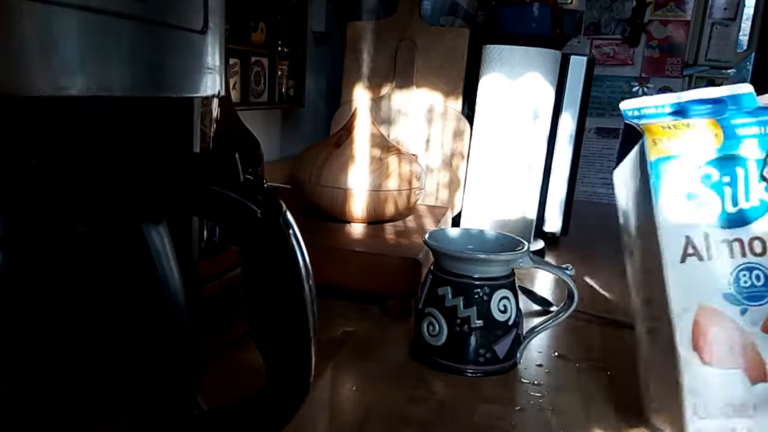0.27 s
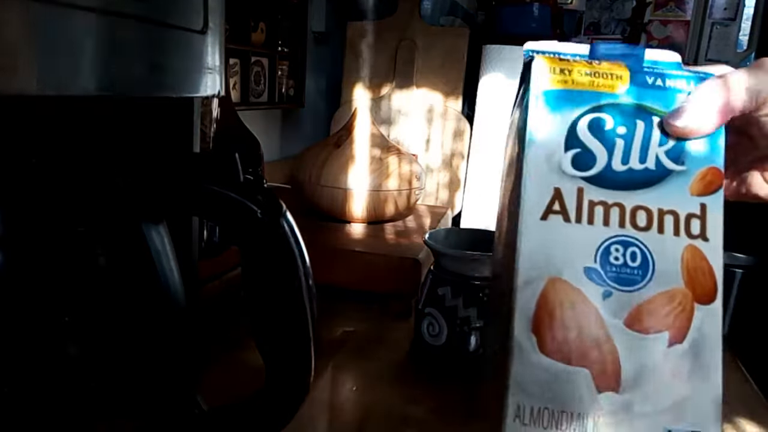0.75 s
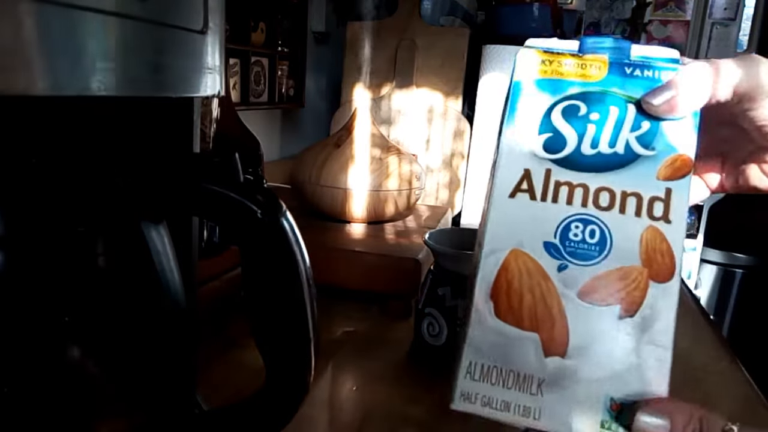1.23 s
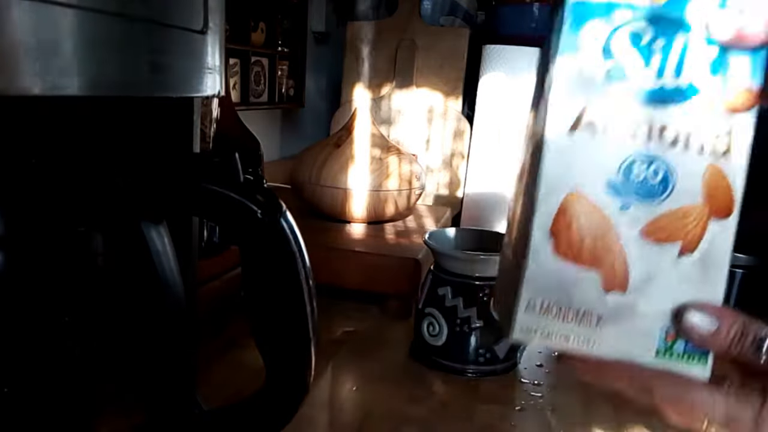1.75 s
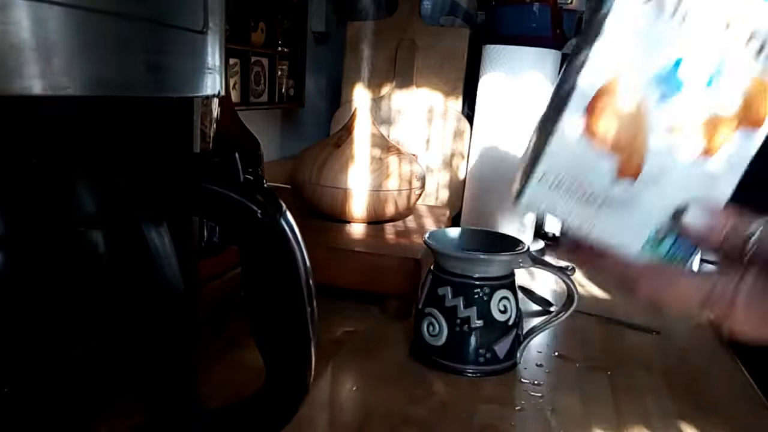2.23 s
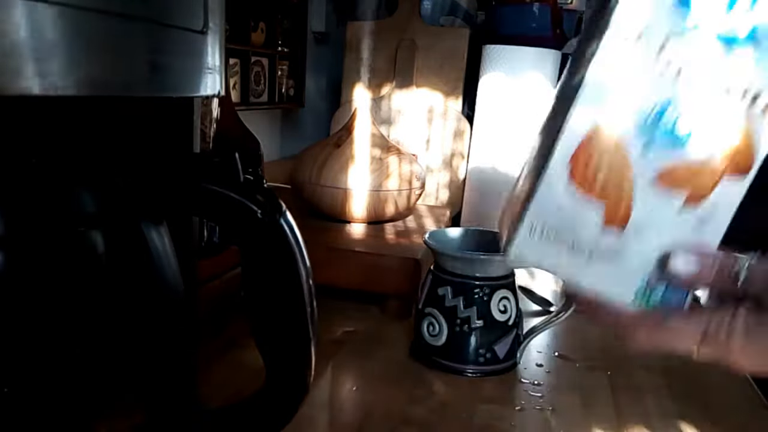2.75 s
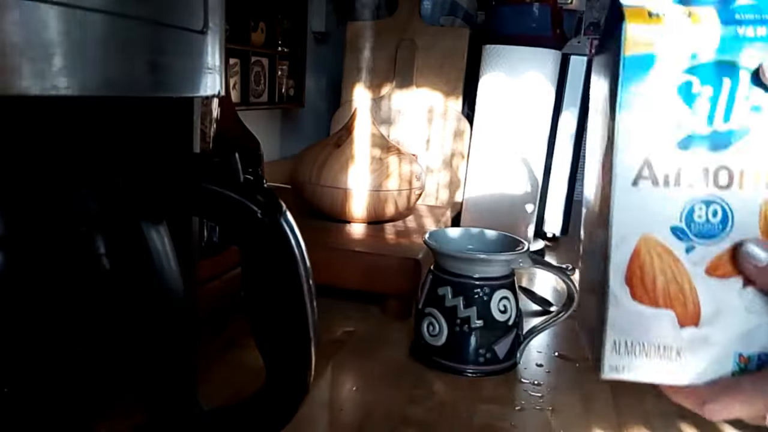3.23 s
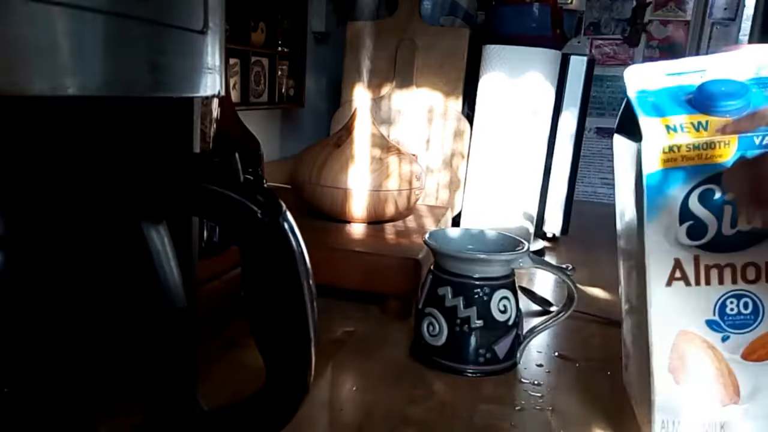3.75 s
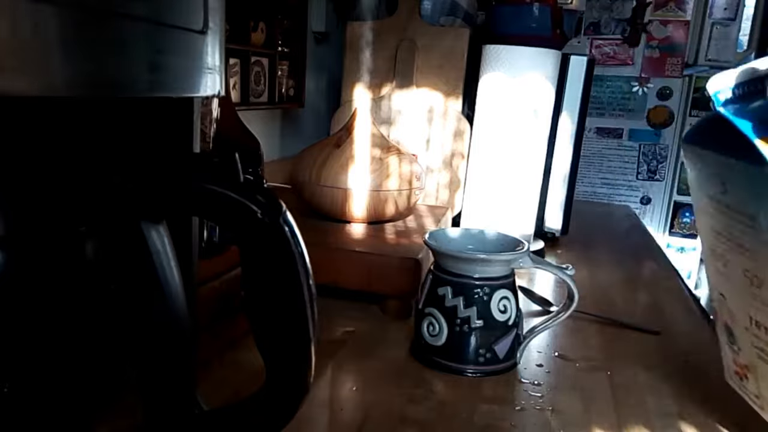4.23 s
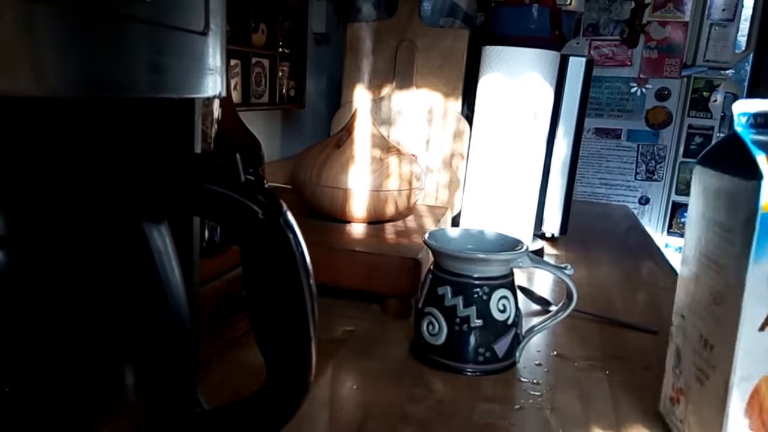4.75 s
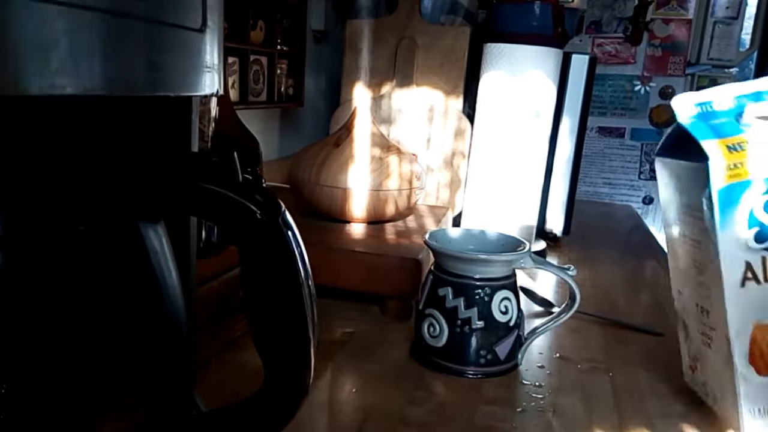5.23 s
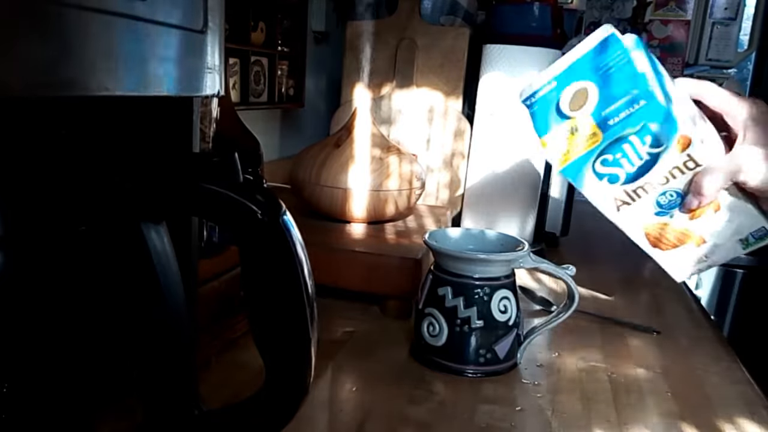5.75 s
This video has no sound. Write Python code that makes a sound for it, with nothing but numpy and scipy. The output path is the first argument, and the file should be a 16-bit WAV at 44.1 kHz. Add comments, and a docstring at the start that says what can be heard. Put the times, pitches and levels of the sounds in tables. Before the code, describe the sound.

A cardboard milk carton is handled close to a modest microphone. Light scuffing leads to a crisp double knock, then quick shakes make the liquid slosh and splash inside while the walls tick and rattle. After a pause there are a few hollow taps, more finger rustle, a strong boxy thud and a faint last scuff. Low room hum throughout, very little reverberation.

```python
"""In a quiet kitchen a hand lifts a paper carton of milk, shakes it and sets it on a wooden counter.
An appliance hums as wavering sines over shaped room noise; fingers rustle as dense grains on the card.
The card ticks in struck modes and rattling grains; the hollow carton thumps as softly begun decaying sines.
The milk slaps the walls, gurgles and sprays: random clicks through resonances, surging together."""
import sys
import numpy as np
from scipy import signal
from scipy.fft import rfft, irfft, next_fast_len
from scipy.io import wavfile

SR = 44100
rng = np.random.default_rng(int(sys.argv[2]) if len(sys.argv) > 2 else 0)


def wrap_up_sound(samples):
    """Save the sound to the file named by the first command line argument, as 16-bit audio."""
    columns = np.atleast_2d(samples).T
    # keep every value between -1 and 1, then stretch to whole-number steps
    tamed = np.clip(columns, -1, 1)
    steps = np.round(tamed * 32767).astype(np.int16)
    wavfile.write(sys.argv[1], SR, steps)


N = 263718


def from_db(db):
    """Logarithmic level: the amplitude gain of a value in dB."""
    return 10 ** (np.asarray(db) / 20)


def rms_one(x):
    """Normalisation: scales a signal to rms 1."""
    return x / np.sqrt(np.mean(x ** 2) + 1e-20)


def sine(hz, t):
    """Simple harmonic motion: a sine of peak 1."""
    return np.sin(2 * np.pi * hz * t)


def decay(t, t60_s):
    """Exponential damping: the amplitude falls 60 dB in t60_s."""
    return from_db(-60 * t / t60_s)


def coloured(x, spectrum):
    """Spectral shaping: weights a white signal by a (frequency_hz, level_db) table; rms 1."""
    size = next_fast_len(N)
    hz, level_db = np.transpose(spectrum)
    log_hz = np.log(np.arange(size // 2 + 1) * SR / size + 1)
    gain = from_db(np.interp(log_hz, np.log(hz), level_db))
    return rms_one(irfft(rfft(x, size) * gain, size)[:N])


def drift(rate_hz):
    """Low-pass noise: a slow random fluctuation of rms 1."""
    r = np.exp(-2 * np.pi * rate_hz / SR)
    noise = rng.standard_normal(N + SR)
    return rms_one(signal.lfilter([1], [1, -2 * r, r * r], noise)[SR:])   # settled after one second


def resonance(x, hz, width_hz):
    """Damped resonator: a two-pole band-pass with gain 1 at its peak."""
    r = np.exp(-np.pi * width_hz / SR)
    poles = [1, -2 * r * np.cos(2 * np.pi * hz / SR), r * r]
    return signal.lfilter([(1 - r * r) / 2, 0, (r * r - 1) / 2], poles, x)


def grains(per_s, spread_db):
    """Random impulse process: clicks of uneven size and sign."""
    sizes = from_db(spread_db * np.minimum(rng.exponential(1, N), 4))
    signs = rng.choice([-1, 1], N)
    return sizes * signs * (rng.random(N) < per_s / SR)


def add(out, start_s, sound):
    """Superposition: mixes a sound in at its start time."""
    at = round(start_s * SR)
    out[at:at + len(sound)] += sound[:N - at]


def played(swells, layers):
    """Swelling envelopes: straight in dB up to a crest and down; overlapping swells add in power."""
    onset_depth_db = 13.5   # how far under its crest a swell is one rise time earlier
    t, out = np.arange(N) / SR, 0
    shapes = []
    for crest_s, rise_s, fall_db_per_s, *_ in swells:
        before_db = onset_depth_db * (crest_s - t) / max(rise_s, .002)
        after_db = fall_db_per_s * (t - crest_s)
        shapes.append(from_db(-np.maximum(before_db, after_db)))
    power_shapes = np.array(shapes) ** 2
    for level_db, layer in zip(np.transpose(swells)[3:], layers):
        out = out + np.sqrt(from_db(level_db) ** 2 @ power_shapes) * layer
    return out


# spectrum of the room noise: frequency_hz, relative level_db (per Hz)
ROOM_SPECTRUM = [(25, -18), (48, 0.5), (70, -23), (86, -14), (110, -0.5), (170, -9.5), (269, -2.5),
                 (382, -12.5), (473, -3.5), (637, -13), (881, -13.5), (1000, -17.5), (2000, -24),
                 (4000, -26.5), (5200, -22), (7200, -24), (8200, -35.5), (11500, -42.5), (13800, -41.5),
                 (14700, -28.5), (15800, -36)]
# partials of the appliance motor: frequency_hz, mean level_db (rms)
MOTOR_HUM = [(59.2, -65.5), (118.4, -69), (236.9, -71)]
# noise ringing in the kitchen: frequency_hz, width_hz, level_db (rms)
ROOM_RESONANCES = [(271, 64, -66.5), (513, 67, -76)]


def room_tone():
    """Stationary background: steady noise, a slightly wavering motor hum and two broad room resonances."""
    t = np.arange(N) / SR
    out = from_db(-58) * coloured(rng.standard_normal(N), ROOM_SPECTRUM)
    for hz, level_db in MOTOR_HUM:
        level = from_db(level_db + 0.84 * drift(3.3))
        phase = 2 * np.pi * hz * t + 0.25 * drift(2.6)
        out += level * np.sqrt(2) * np.sin(phase)
    for hz, width_hz, level_db in ROOM_RESONANCES:
        out += from_db(level_db) * rms_one(resonance(rng.standard_normal(N), hz, width_hz))
    return out


def kitchen(x):
    """Reverberation: convolution with decaying dull noise after a short gap."""
    t60_s, gap_s = 0.082, .006
    t = np.arange(SR // 2) / SR
    dull_noise = signal.lfilter([1], [1, -.5], rng.standard_normal(len(t)))
    tail = dull_noise * decay(t, t60_s) * (t > gap_s)
    return signal.fftconvolve(x, tail / np.sqrt(np.sum(tail ** 2)))[:N]


# air and panel resonances of the carton: frequency_hz, width_hz, gain_db
CARTON_RESONANCES = [(238.5, 73, -4.5), (310, 106, 2), (386, 117, -0.5), (552, 250, -19), (127.4, 29, -5)]


def hollow(x):
    """Cavity resonance: the carton's low modes in parallel with alternating sign; rms 1."""
    out = 0
    for k, (hz, width_hz, gain_db) in enumerate(CARTON_RESONANCES):
        out = out + (-1) ** k * from_db(gain_db) * resonance(x, hz, width_hz)
    return rms_one(out)


# spectrum shared by the splash and the finger scuff: frequency_hz, relative level_db (per Hz)
SPLASH_SPECTRUM = [(290, 2.5), (500, -2), (742, 1.5), (996, -2), (1510, 1.5), (1620, 0), (2200, -3),
                   (4500, -9.5), (5850, -45), (9900, -120)]
# spectrum shared by milk spray, card rustle and tick noise: frequency_hz, relative level_db (per Hz)
SPRAY_SPECTRUM = [(2500, -5), (3500, -5), (4420, -3), (6490, 1.5), (7410, -2.5), (9000, -16.5),
                  (10700, -26), (13400, -37), (14700, -30), (15800, -0.5)]
# fingers sliding on the card, timed at the firmest grip:
# crest_s, rise_s, fall_db_per_s, rustle_db, scuff_db, dull_rub_db
FINGER_SLIDES = [(0.28, 0.14, 42, -62, -68, -65.5), (0.72, 0.16, 68, -58, -62, -61),
                 (0.845, 0.012, 158, -56, -61, -54), (1.44, 0.093, 67, -60.5, -60.5, -61),
                 (1.52, 0.012, 51, -63, -56, -47), (1.585, 0.047, 200, -63, -55, -39.5),
                 (1.83, 0.26, 90, -58.5, -63.5, -74), (3.995, .01, 100, -55.5, -60, -58),
                 (4.37, 0.13, 51, -62, -64.5, -59), (4.53, .008, 56, -84, -81, -60),
                 (4.705, 0.015, 80, -55, -64, -51.5), (4.81, 0.073, 41, -56, -67, -72),
                 (4.872, 0.017, 250, -51.5, -53, -37.5), (4.92, .02, 102, -62, -56, -48),
                 (5.2, 0.17, 92, -66, -74, -65)]


def handling():
    """Sliding friction: skin on coated card rustles and scuffs, with a dull rub through the hollow box."""
    slips = from_db(2.9 * drift(12.3))
    rustle = slips * coloured(grains(4000, 2.1), SPRAY_SPECTRUM)
    scuff = slips * coloured(grains(3000, 1.8), SPLASH_SPECTRUM)
    dull_rub = hollow(grains(500, 2.4))
    return played(FINGER_SLIDES, (rustle, scuff, dull_rub))


# modes of the stiff card and cap: frequency_hz, width_hz, gain_db
CARD_MODES = [(680, 240, 10.5), (1100, 720, 7), (1510, 280, 5), (1816, 91, -1), (2216, 210, 1.5),
              (2874, 66, -1.5), (3260, 430, 0), (4000, 150, -4.5), (5700, 150, -29), (6700, 300, -10)]
# ticks and slaps on the card walls, the levels taken before onset shaping:
# start_s, low_ring_db, low_ring_hz, high_ring_hz, card_noise_db, spray_db, rattle_t60_s
CARD_TICKS = [(0.26, -63, 1220, 6010, -61.5, -59, 0.092), (1.5891, -33.5, 1570, 7350, -43.5, -46, 0.077),
              (1.656, -42, 1510, 5700, -45, -54, .05), (1.6614, -24, 1510, 5700, -36.5, -43, 0.1),
              (1.662, -24, 3720, 4400, -43.5, -48, 0.16), (1.8085, -62, 1050, 5510, -75, -57.5, 0.25),
              (1.947, -70, 1300, 5430, -82, -55, 0.05), (2.0559, -49, 2200, 3230, -65, -52, 0.16),
              (2.1205, -49, 2200, 5840, -38, -37.5, 0.13), (2.217, -33, 2020, 4860, -65, -47, 0.063),
              (2.2715, -27, 2280, 5150, -33, -32.5, 0.084), (2.2803, -12, 2060, 6220, -37, -41, 0.13),
              (2.3035, -21, 2320, 2770, -38, -33, 0.21), (2.3877, -31, 2500, 6030, -38, -31.5, 0.094),
              (2.4103, -38, 1460, 3780, -43, -36.5, 0.11), (2.4622, -26, 1770, 2760, -40, -54, 0.16),
              (2.5336, -25, 2070, 6640, -39, -36.5, 0.25), (2.769, -31, 2140, 5950, -41, -36, 0.11),
              (2.7897, -20, 2190, 2910, -31, -39, .12), (2.8088, -25, 1730, 6700, -46, -27.5, 0.067),
              (3.0593, -37.5, 1460, 6710, -60, -61, 0.079), (3.078, -62, 1500, 9300, -62, -63, .03),
              (3.109, -38, 1800, 6540, -54, -48, 0.056), (3.13, -60, 1800, 9300, -67, -60, .03),
              (3.139, -40, 1420, 2630, -46, -54, 0.058), (3.6094, -62, 1310, 6300, -74, -55.5, 0.3),
              (3.9723, -25.5, 2600, 3580, -39, -35.5, 0.057), (3.99, -44, 2180, 2740, -53.5, -64, 0.23),
              (4.1141, -38, 1496, 6600, -49.5, -46.5, .06), (4.275, -48, 2210, 4600, -57, -58, 0.073),
              (4.2824, -36, 1660, 2620, -53, -48.5, 0.18), (4.8168, -28, 2250, 4530, -41, -40.5, 0.11),
              (4.8167, -28, 1100, 5970, -41, -47.5, 0.11), (4.8276, -24.5, 2200, 6000, -52, -46, 0.13),
              (4.8374, -29, 2260, 3730, -49, -49, 0.1), (4.9192, -59, 1580, 6220, -51.5, -53.5, 0.13),
              (4.9418, -44, 1033, 3200, -39.5, -44.5, 0.05), (4.947, -42, 3230, 3300, -52, -62, 0.044)]


def ticks():
    """Modal excitation: a crack rings two pitches and the card's modes, then small contacts rattle away."""
    out, t = np.zeros(N), np.arange(SR // 4) / SR
    contacts = grains(2500, 3.1)
    spray = coloured(rng.standard_normal(N), SPRAY_SPECTRUM)
    mode_hz = np.array(CARD_MODES)[:, 0]
    signs = (-1) ** np.arange(len(CARD_MODES))
    rattled = np.array([from_db(db) * rms_one(resonance(contacts, hz, width_hz))
                        for hz, width_hz, db in CARD_MODES])
    struck = np.array([from_db(db) * sine(hz, t) * np.exp(-np.pi * width_hz * t)
                       for hz, width_hz, db in CARD_MODES])
    soft_onset = 1 - np.exp(-t / 0.0017)
    sharp_onset = 1 - np.exp(-t / 0.0001)
    for start_s, level_db, low_hz, high_hz, card_db, spray_db, t60_s in CARD_TICKS:
        at = round(start_s * SR)
        now = slice(at, at + len(t))
        # modes weaken with their distance in octaves from the two ring pitches
        near_low = from_db(-5.0 * np.abs(np.log2(mode_hz / low_hz)))
        near_high = from_db(-12.0 * np.abs(np.log2(mode_hz / high_hz)))
        weights = (near_low + 0.18 * near_high) * signs
        low = from_db(level_db) * sine(low_hz, t) * decay(t, 31.3 / low_hz)
        high = from_db(spray_db + 0.5) * sine(high_hz, t) * decay(t, 120.0 / high_hz)
        # the first contact strikes all the card's modes at once
        crack = from_db(card_db - 4) * (weights @ struck)
        spray_now = from_db(spray_db) * spray[now]
        snap = 1.28 * spray_now * decay(t, 0.0078)   # first dry contact
        rattle = from_db(card_db) * rms_one(weights @ rattled[:, now]) + spray_now
        sharp = (high + snap + crack) * sharp_onset
        soft = (low + rattle * decay(t, t60_s)) * soft_onset
        add(out, start_s, sharp + soft)
    return out


# hollow thumps of the carton, the levels taken before decay; air and panel also before the soft onset:
# start_s, air_level_db (peak), pitch_hz, t60_s, panel_db (peak), counter_thud_db (rms)
CARTON_THUMPS = [(0.284, -38, 116, .06, -64, -66), (0.839, -34, 135, .064, -64, -48),
                 (0.8431, -22, 233, 0.022, -60, -55), (0.86, -35, 134, .057, -60, -53),
                 (0.899, -36, 108, .047, -58, -62), (1.511, -39, 273, 0.073, -62, -63),
                 (1.5906, -19, 279, 0.029, -15.5, -54), (1.6611, -12.5, 388, 0.032, -55, -70),
                 (1.689, -37.5, 445, 0.16, -56, -65), (2.117, -28.5, 332, 0.074, -47, -51),
                 (2.33, -24.5, 274, 0.079, -45, -57), (2.372, -22.5, 301, 0.042, -38, -41),
                 (2.407, -27, 374, 0.056, -25, -42), (2.459, -29, 310, 0.043, -48, -57),
                 (2.623, -37.5, 310, 0.12, -54, -60), (2.789, -30, 278.5, 0.11, -41, -56),
                 (2.905, -28, 251, 0.08, -32.5, -62), (2.93, -38, 130, 0.092, -45, -53),
                 (3.132, -45, 386, 0.15, -50, -53), (3.97, -26, 350, 0.032, -27.5, -62),
                 (3.989, -31.5, 450, 0.027, -35, -52), (4.034, -40, 401, .04, -62, -62),
                 (4.048, -39, 380, 0.038, -53, -66), (4.114, -29.5, 413, 0.032, -40, -67),
                 (4.282, -29.5, 318, 0.058, -32, -47), (4.294, -28, 290, 0.022, -40, -67),
                 (4.526, -42, 305, 0.087, -50, -49.5), (4.66, -44, 354, 0.12, -66, -64),
                 (4.69, -42, 298, 0.096, -48, -47.5), (4.816, -21, 343, 0.043, -42, -54),
                 (4.828, -19, 308, 0.051, -22.5, -39), (4.8551, -5.5, 330, 0.028, -25, -34),
                 (4.9395, -22.5, 378.5, .09, -38.5, -63), (5.006, -28.5, 95.5, 0.044, -35, -57),
                 (5.029, -31.5, 348, 0.028, -47, -58), (5.307, -43.5, 264, .11, -55, -73)]


def thumps():
    """Cavity ringing: a soft push excites the air, a higher panel mode and the counter's low thud."""
    rise_cycles, panel_ratio = 0.82, 1.75   # panel_ratio: panel pitch over air pitch
    out, t = np.zeros(N), np.arange(SR // 4) / SR
    for start_s, level_db, hz, t60_s, panel_db, thud_db in CARTON_THUMPS:
        soft_onset = 1 - np.exp(-(t * hz / rise_cycles) ** 2)
        air = from_db(level_db) * sine(hz, t) * decay(t, t60_s)
        panel = from_db(panel_db) * sine(panel_ratio * hz, t) * from_db(-75 * t / t60_s)
        thud = from_db(thud_db) * np.sqrt(2) * sine(105, t) * decay(t, 0.12)
        add(out, start_s, soft_onset * (air + panel) + thud)
    return out


def bubbles(per_s, low_hz, high_hz, cycles):
    """Bubble resonance: drops and air pockets each ring for some cycles at one of 16 pitches."""
    clicks = grains(per_s, 1.8)
    dealt = rng.integers(0, 16, N)
    out = 0
    for k, hz in enumerate(np.geomspace(low_hz, high_hz, 16)):
        out = out + resonance(clicks * (dealt == k) + 1e-18, hz, 1.6 * hz / cycles)
    return out


# surges of milk against the walls, the levels at the crest before the random surging:
# crest_s, rise_s, fall_db_per_s, wall_boom_db, splash_db, spray_db
MILK_SURGES = [(2.124, 0.0095, 450, -36, -46.5, -50), (2.22, 0.059, 300, -51.5, -47.5, -51),
               (2.28, 0.009, 70, -41.5, -44.5, -40.5), (2.33, 0.043, 350, -40.5, -39.5, -38.5),
               (2.378, .008, 109, -36, -42.5, -37), (2.419, 0.027, 134, -41, -35.5, -48),
               (2.535, 0.0095, 110, -48, -43, -42), (2.581, 0.071, 300, -45, -43.5, -61),
               (2.625, 0.0071, 89, -40.5, -40.5, -44.5), (2.705, 0.13, 453, -38, -39.5, -43),
               (2.796, .03, 250, -47, -38.5, -32.5), (2.856, 0.048, 48, -51, -44, -45.5),
               (2.925, 0.06, 205, -37, -39, -47), (3.114, .004, 100, -52, -65, -54),
               (3.157, .04, 350, -47, -51, -60), (3.219, 0.051, 222, -51, -59.5, -50.5)]


def slosh():
    """Liquid impact: milk booms on the walls, pockets gurgle, drops plop and spray hisses, surging together."""
    surge = drift(20)
    boom = from_db(0.55 * surge) * hollow(grains(600, 4.5))
    gurgle = 0.54 * rms_one(bubbles(300, 487, 2600, cycles=36.0))
    drops = rms_one(bubbles(3000, 570, 4770, cycles=8.6)) + 0.65 * rng.standard_normal(N)
    splash_swell = from_db(0.43 * surge + 0.52 * drift(67))
    splash = splash_swell * coloured(gurgle + drops, SPLASH_SPECTRUM)
    spray_swell = from_db(2.3 * surge + 0.5 * drift(60))
    spray = spray_swell * coloured(grains(3000, 1.6), SPRAY_SPECTRUM)
    return played(MILK_SURGES, (boom, splash, spray))


def scene():
    """Superposition: direct carton sounds, their reverberation and the room tone."""
    carton = thumps() + ticks() + slosh() + handling()
    reverberation = from_db(-16) * kitchen(carton)
    return (carton + reverberation + room_tone())[None]


def record(dry):
    """Band limiting: the small microphone loses the deep bass; the top is cut steeply."""
    low_cut_hz, high_cut_hz = 51, 15850
    bass_cut = signal.butter(3, low_cut_hz, "high", fs=SR, output="sos")
    top_cut = signal.cheby2(20, 70, high_cut_hz, fs=SR, output="sos")
    return signal.sosfilt(top_cut, signal.sosfilt(bass_cut, dry))


dry = scene()
out = record(dry)
wrap_up_sound(out)
```